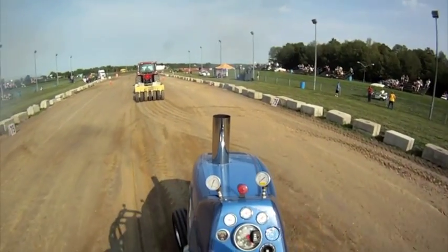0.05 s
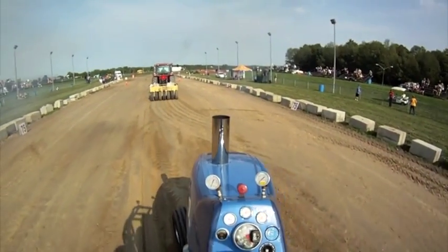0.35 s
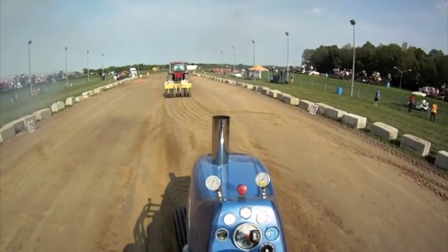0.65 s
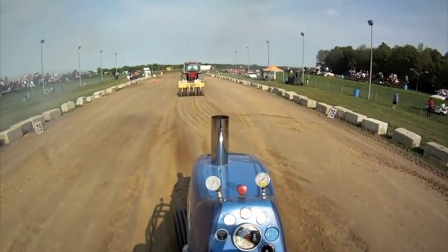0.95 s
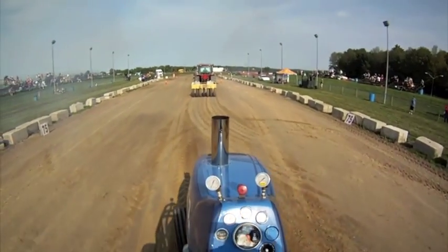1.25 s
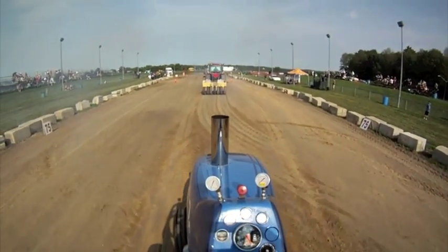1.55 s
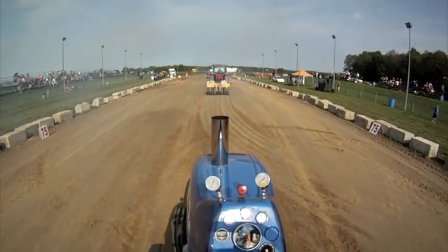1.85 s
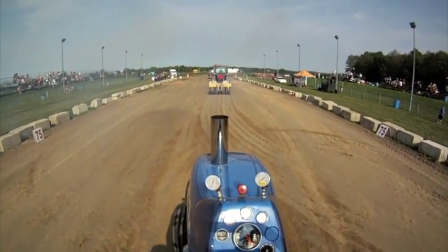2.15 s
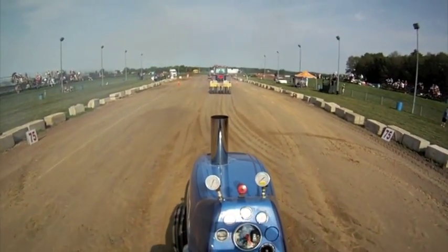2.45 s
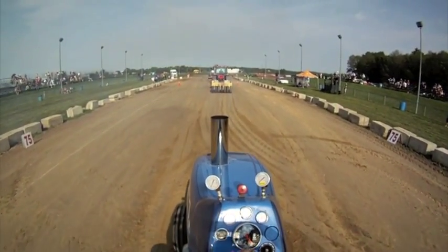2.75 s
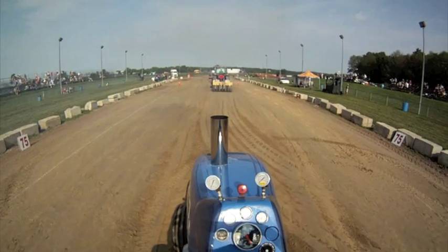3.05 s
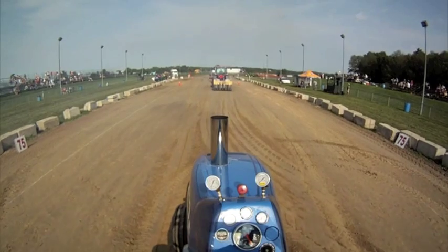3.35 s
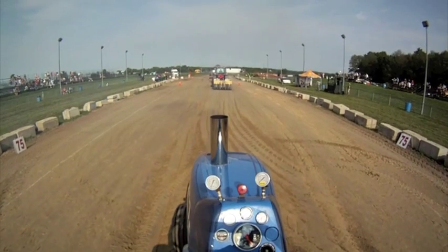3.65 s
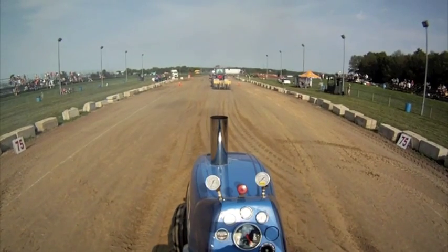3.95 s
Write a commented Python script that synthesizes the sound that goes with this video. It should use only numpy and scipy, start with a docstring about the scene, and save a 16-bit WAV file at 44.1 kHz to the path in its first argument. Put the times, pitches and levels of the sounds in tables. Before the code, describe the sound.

A diesel tractor roars at full throttle, heard close from the driver's seat outdoors. The load drags the engine down, a high ring swells into a squeal, and it settles into hard, rapid thumping, with air buffeting the microphone.

```python
"""A six-cylinder diesel tractor at full throttle, close up, on a small camera's microphone at the
driver's seat. The load drags the engine down until it lugs with one hard thump a cycle. The exhaust
booms and barks, the block clatters through ringing panels, gas rushes and a high ring swells to a
squeal. Behind them loose metal rattles and the air buffets. The camera holds each sample, which adds
a fizzy top."""
import sys
import numpy as np
from scipy import signal
from scipy.fft import rfft, irfft
from scipy.io import wavfile
from scipy.ndimage import uniform_filter1d

SR = 44100
rng = np.random.default_rng(int(sys.argv[2]) if len(sys.argv) > 2 else 0)


def int16_out(signal):
    """Quantize to a 16-bit WAV file."""
    q = np.round(np.clip(np.atleast_2d(signal).T, -1, 1) * 32767)
    wavfile.write(sys.argv[1], SR, q.astype(np.int16))


N = 176400

# exhaust orders: multiple of the cycle rate, relative level/dB running, relative level/dB lugging
EXHAUST_ORDERS = [(5, -49, -37), (6, -16, -21), (7, -36, -28), (8, -23.5, -23), (9, -24.5, -38),
                  (10, -50, -17), (11, -65, -21), (12, -48, -11), (13, -72, -90), (14, -30.5, -17),
                  (15, -52.5, -27), (16, -45, -58)]
# boom at the seat, before its trim: t/s, level/dB
BOOM_ENVELOPE = [(0.0, -20), (0.15, -14.5), (1.3, -14.5), (1.58, -23.5), (1.63, -15), (1.7, -31),
                 (2.0, -16), (2.03, -25.5), (2.33, -24), (2.39, -14.5), (2.64, -18), (2.66, -50),
                 (2.72, -16.5), (3.92, -16.5), (3.98, -15), (4.0, -37)]

def boom(cycle, lug, trim_db=-3, waver_db=1.5):
    """Low exhaust orders, which crest together once a cycle."""
    gains = np.array([undb(running + (lugging - running) * lug) for _, running, lugging in EXHAUST_ORDERS])
    gains = gains / np.sqrt((gains ** 2).sum(0) / 2)
    out = 0
    for (order, _, _), gain in zip(EXHAUST_ORDERS, gains):
        out = out + gain * undb(waver_db * walk(12)) * np.cos(2 * np.pi * order * cycle)
    return out * undb(curve(BOOM_ENVELOPE) + trim_db)


# cylinders in firing order, relative level/dB: bark running, bark lugging, roar running, roar lugging
CYLINDER_LEVELS = [(-4.5, -3, -4.5, -0.5), (-2.5, -5, -4.5, -3.5), (-10, 0.5, -3, -2), (4.5, -1, -3, -1.5),
                   (-9, 9, -3.5, -1.5), (13, -11, -1, -1)]

def bark(cycle, lug, scatter_db=1.4):
    """Each firing leaves the stack as a falling yelp; the cylinders are unequal."""
    count = len(CYLINDER_LEVELS)
    firing = np.floor(cycle * count).astype(int)
    onsets = np.flatnonzero(np.diff(firing)) + 1
    levels = np.array(CYLINDER_LEVELS)[firing[onsets] % count]
    scatter = scatter_db * rng.standard_normal(len(onsets))

    def yelps(firing_db, start_hz, end_hz, length_s):
        pulses = np.zeros(N)
        pulses[onsets] = undb(firing_db + scatter)
        hz = np.linspace(start_hz, end_hz, int(length_s * SR))
        yelp = np.hanning(len(hz)) * np.sin(2 * np.pi * np.cumsum(hz) / SR)
        return unit(signal.fftconvolve(pulses, yelp, "same"))

    running = yelps(levels[:, 0], start_hz=535, end_hz=246, length_s=0.07) * undb(-26)
    lugging = yelps(levels[:, 1], start_hz=365.5, end_hz=309, length_s=0.16) * undb(-30.5)
    return running * np.sqrt(1 - lug) + lugging * np.sqrt(lug)


# smooth colour of the roar: f/Hz, relative level/dB
ROAR_SLOPE = [(60, -71), (150, -54.5), (250, -50), (550, -56), (760, -55.5), (870, -60), (1100, -56),
              (1400, -64), (1750, -69), (2250, -64), (2500, -70.5), (3900, -76.5), (4500, -85.5),
              (5100, -80), (5600, -93.5)]
# resonances of stack and panels: f/Hz, width/Hz, lift/dB
PANEL_RESONANCES = [(192, 31, 5.5), (331, 50.5, 15), (470, 77, 6.5), (598.6, 46, 10.5), (689, 50, 8),
                    (792, 61, 12.5), (968, 130, 2), (1122, 33, 12), (1205.3, 69.6, 13.5), (1302, 18, 6.5),
                    (1519, 19, 6), (1945, 97, 6.5), (2078, 14, 10), (2177, 128, 5)]
# roar at the seat: t/s, treble level/dB before its trim, middle level/dB
ROAR_ENVELOPE = [(0.0, -39.5, -37), (0.07, -34, -25), (0.19, -33.5, -26), (1.27, -33.5, -24.5),
                 (1.57, -32.5, -26.5), (1.61, -30, -24.5), (1.67, -36.5, -30), (1.86, -32, -25),
                 (2.17, -28, -21), (2.33, -28, -20), (2.58, -35.5, -27.5), (2.8, -29, -20),
                 (2.88, -33.5, -26), (3.56, -32, -22.5), (3.83, -35, -26), (3.85, -33, -23),
                 (4.0, -30.5, -22.5)]

def roar(cycle, lug, split_hz=1000, treble_trim_db=1, puff_db=1, flutter_db=0.78):
    """Clatter and rushing gas, pulsed by the firings, ring the stack and panels."""
    count = len(CYLINDER_LEVELS)
    running, lugging = (np.interp(cycle * count, np.arange(count), levels, period=count)
                        for levels in np.array(CYLINDER_LEVELS).T[2:])
    cylinder_db = running + (lugging - running) * lug
    puff = undb(cylinder_db + puff_db * np.cos(2 * np.pi * count * cycle) + flutter_db * walk(35.06))
    knocks, gas = clatter(cycle), rng.standard_normal(N)

    def panel_sound(clatter_share, unit_band_hz):
        drive = puff * (np.sqrt(clatter_share) * knocks + np.sqrt(1 - clatter_share) * gas)
        ringing = colour(drive, ROAR_SLOPE, PANEL_RESONANCES)
        return ringing / band_rms(ringing, *unit_band_hz)

    middle = panel_sound(clatter_share=0.58, unit_band_hz=(480, 950))
    treble = panel_sound(clatter_share=0.26, unit_band_hz=(1500, 4500))
    lowpass = 1 / (1 + (freqs() / split_hz) ** 10)
    middle = irfft(rfft(middle) * lowpass) * undb(curve(ROAR_ENVELOPE, column=2))
    treble = irfft(rfft(treble) * (1 - lowpass)) * undb(curve(ROAR_ENVELOPE) + treble_trim_db)
    return middle + treble


def clatter(cycle, count=260):
    """Many small knocks in the block come back at the same crank angles in every cycle."""
    angles, sizes = rng.random(count), rng.standard_normal(count)
    cycle_starts = np.arange(np.floor(cycle[0]), cycle[-1])[:, None]
    onsets = np.interp(cycle_starts + angles, cycle, np.arange(N), left=N, right=N).astype(int)
    knocks = np.bincount(onsets.ravel(), np.tile(sizes, len(cycle_starts)), N + 1)
    return unit(knocks[:N])


# high ring at the seat: t/s, f/Hz, level/dB
HIGH_RING = [(0, 1184, -26.5), (.2, 1170, -27), (.78, 1190, -25), (.88, 1192, -21), (1.4, 1182, -23.5),
             (1.44, 1133, -17), (1.88, 1128, -17.5), (1.93, 1141, -37), (4, 1175, -32.5)]
# falling squeals as the engine bogs: start t/s, length/s, start f/Hz, crest level/dB
BOG_CHIRPS = [(1.97, 0.067, 1122, -23), (2.003, 0.16, 1420, -35), (2.051, 0.3, 1084, -25.5),
              (2.17, 0.2, 1380, -26), (2.2, 0.098, 1190, -34)]

def squeal(cycle, throb_db=3, throb_full_s=2.1, fall_hz_per_s=510):
    """A high ring that sinks a little, breaks into falling chirps as the engine bogs, then throbs."""
    depth = throb_db * curve([(LUG_FULL_S, 0), (throb_full_s, 1)])
    throb = depth * np.cos(4 * np.pi * cycle + np.pi / 2)  # once a shaft turn, twice a cycle
    out = shaky_tone(curve(HIGH_RING)) * undb(curve(HIGH_RING, column=2) + throb)
    for start, length, hz, db in BOG_CHIRPS:
        age = np.clip(np.arange(N) / SR - start, 0, length)
        out = out + shaky_tone(hz - fall_hz_per_s * age) * np.sin(np.pi * age / length) * undb(db)
    return out


def shaky_tone(hz, wobble_hz=6.49, flicker_db=1.1, roughness=0.31):
    """The voice of the squeal: a rough, wobbling tone of rms 1."""
    phase = 2 * np.pi * np.cumsum(hz + wobble_hz * walk(60)) / SR
    flicker = undb(flicker_db * walk(30.03))
    grain = 1 + roughness * (walk(110) + 1j * walk(110))
    return unit((flicker * grain * np.exp(1j * phase)).real)


# resonances of loose metal: f/Hz, width/Hz, level/dB
LOOSE_METAL = [(2610, 280, -44.5), (5300, 220, -63.5)]

def rattle(lug, spread_db=3.5):
    """Loose metal buzzes in short fits while the engine runs fast."""
    out = 0
    for hz, width, db in LOOSE_METAL:
        fits = undb(spread_db * np.clip(walk(78.8), -2, 2))
        out = out + unit(resonate(fits * rng.standard_normal(N), hz, width)) * undb(db)
    return (1 - lug) * out


# buffeting at the microphone: t/s, level/dB
BUFFET_ENVELOPE = [(0, -26), (1.3, -29), (1.75, -26), (1.95, -26.5), (2.45, -22.5), (3, -23), (4, -24.5)]
# its colour: f/Hz, relative level/dB
BUFFET_SLOPE = [(15, -14), (35, -3.5), (55, 0), (90, 12), (130, 0.5), (230, -2), (500, -38.5)]

def buffeting():
    """The air buffets irregularly, low under the boom."""
    return unit(colour(rng.standard_normal(N), BUFFET_SLOPE)) * undb(curve(BUFFET_ENVELOPE))


def undb(db):
    """Decibels to gain."""
    return 10 ** (np.asarray(db) / 20)


def curve(rows, column=1):
    """One column of a time table, joined by straight lines."""
    rows = np.array(rows)
    return np.interp(np.arange(N) / SR, rows[:, 0], rows[:, column])


def walk(rate_hz):
    """Smooth random drift with a spread near 1."""
    span = int(SR / rate_hz)
    steps = np.repeat(rng.standard_normal(N // span + 1), span)
    return 1.447 * uniform_filter1d(uniform_filter1d(steps, span), span)[:N]


def freqs():
    """The frequency of each spectrum bin."""
    return np.arange(N // 2 + 1) * SR / N + 1e-3


def unit(x):
    """Scale to rms 1."""
    return x / np.std(x)


def colour(x, slope, peaks=()):
    """Causal filter: a smooth slope with resonances on top."""
    f, slope = freqs(), np.array(slope)
    db = np.interp(np.log(f), np.log(slope[:, 0]), slope[:, 1])
    for hz, width, lift in peaks:
        db = db + lift * np.exp(-2 * ((f - hz) / width) ** 2)
    cepstrum = irfft(np.log(undb(db)))
    cepstrum[1:N // 2] *= 2  # minimum phase: the ringing follows the knock
    cepstrum[N // 2 + 1:] = 0
    return irfft(rfft(x) * np.exp(rfft(cepstrum)))


def resonate(x, hz, width):
    """A resonance, applied twice for steep flanks."""
    f = freqs()
    return irfft(rfft(x) / (1 + 1j * (f / hz - hz / f) * hz / width / 2) ** 2)


def band_rms(x, low_hz, high_hz):
    """The rms of one band."""
    return np.std(irfft(rfft(x) * ((freqs() > low_hz) & (freqs() < high_hz))))


# engine speed under load: t/s, four-stroke cycle rate f/Hz
CYCLE_RATE = [(0, 15.2), (.22, 15.35), (.35, 15.05), (.55, 14.93), (.68, 14.7), (.82, 14.82), (1.15, 14.5),
              (1.33, 14.15), (1.6, 12.3), (1.9, 10.55), (2.3, 9.15), (2.55, 9.8), (2.72, 9.35),
              (2.92, 9.72), (3.2, 9.56), (3.38, 9.66), (3.55, 9.6), (4, 9.66)]
LUG_FROM_S, LUG_FULL_S = 1.28, 1.78  # the engine goes from running freely to lugging

def scene():
    """The tractor from the driver's seat, in mono; one crank angle times boom, bark, roar and throb."""
    cycle = np.cumsum(curve(CYCLE_RATE)) / SR - 0.71  # the thump falls on whole numbers
    lug = curve([(LUG_FROM_S, 0), (LUG_FULL_S, 1)])
    engine = boom(cycle, lug) + bark(cycle, lug) + roar(cycle, lug)
    return (engine + squeal(cycle) + rattle(lug) + buffeting())[None]


def record(dry):
    """The camera samples its microphone slowly and holds each value, mirroring sound into the treble."""
    hold_hz, antialias_hz, top_hz = 12000, 5450, 15250
    narrow = signal.sosfilt(signal.butter(18, antialias_hz, fs=SR, output="sos"), dry)
    mirrored = narrow * (1 + 2 * np.cos(2 * np.pi * hold_hz * np.arange(N) / SR))
    held = irfft(rfft(mirrored) * np.sinc(freqs() / hold_hz))
    return signal.sosfilt(signal.ellip(10, .1, 80, top_hz, fs=SR, output="sos"), held)


dry = scene()
out = record(dry)
int16_out(out)
```